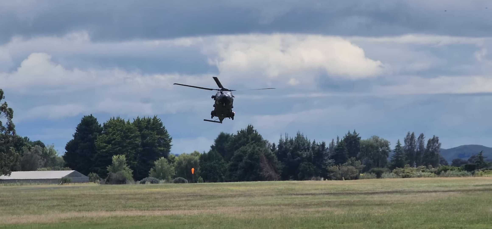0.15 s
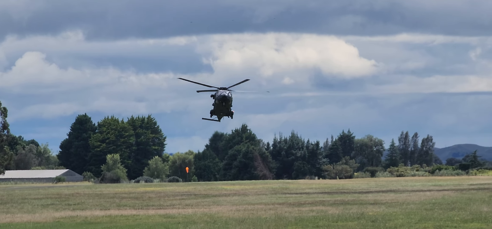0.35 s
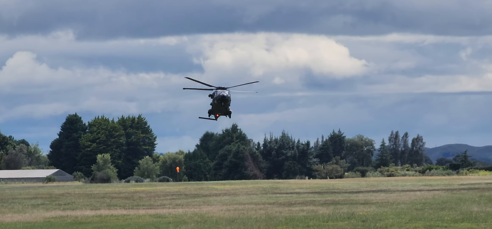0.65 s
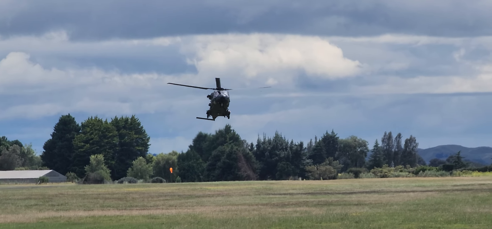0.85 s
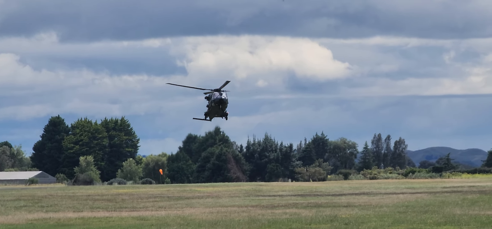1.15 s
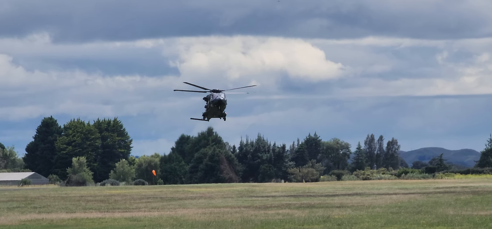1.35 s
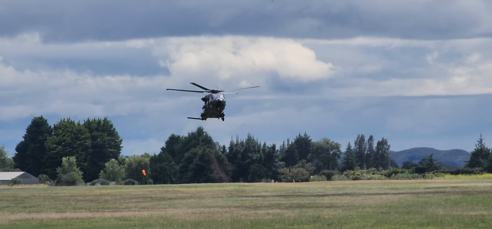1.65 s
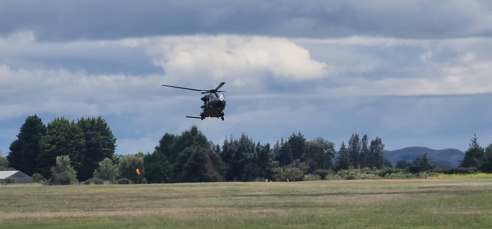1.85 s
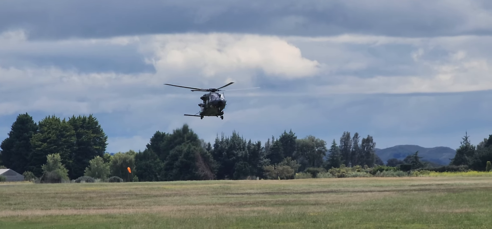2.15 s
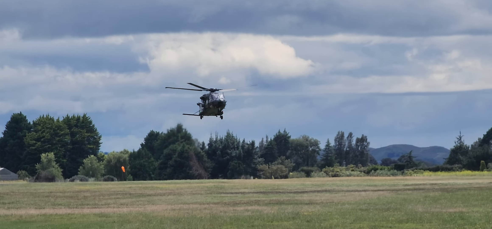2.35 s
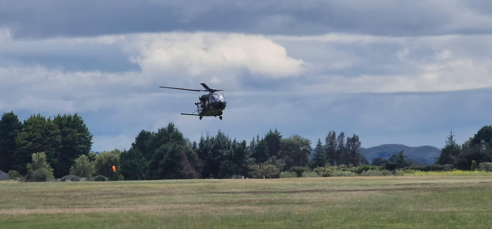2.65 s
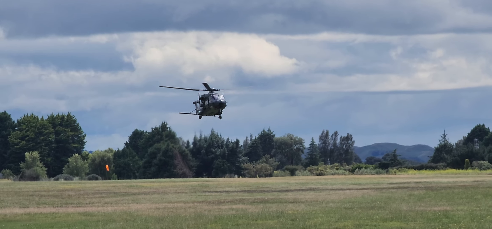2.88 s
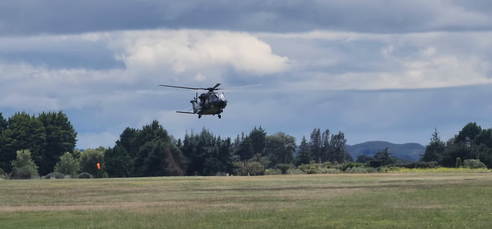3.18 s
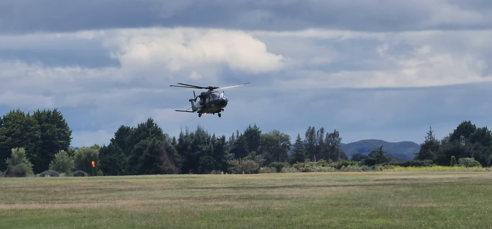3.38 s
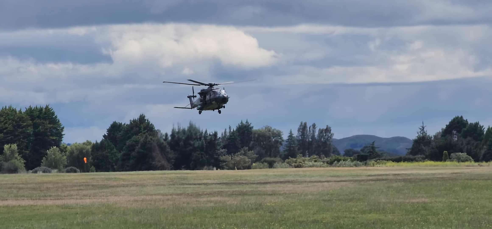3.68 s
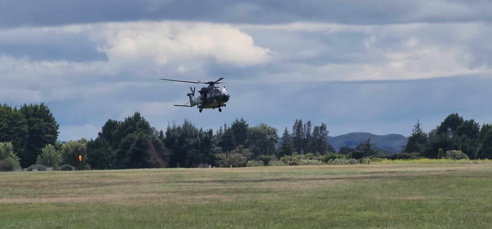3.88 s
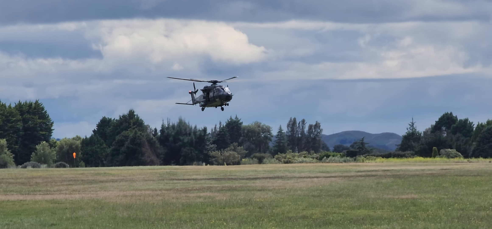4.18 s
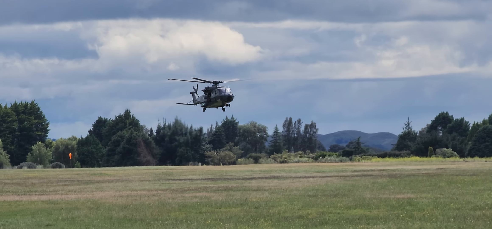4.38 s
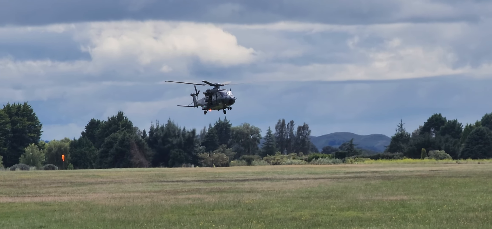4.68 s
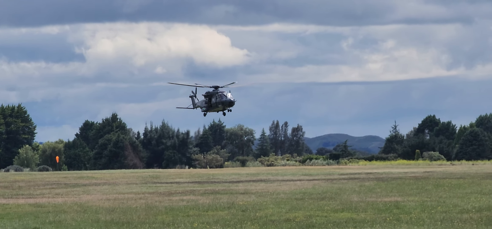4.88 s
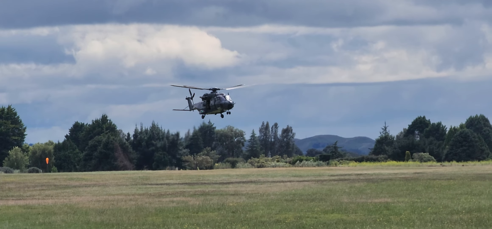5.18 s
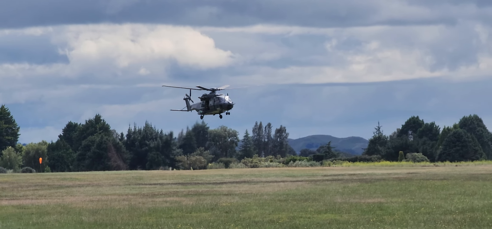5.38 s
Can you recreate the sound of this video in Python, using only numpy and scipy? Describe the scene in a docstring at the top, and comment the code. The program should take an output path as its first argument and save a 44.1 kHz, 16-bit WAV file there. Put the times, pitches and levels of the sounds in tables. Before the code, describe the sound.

A heavy helicopter hovers low over a field, its rotor slapping hard at first, then easing into a breathy chop over turbine roar.

```python
"""On a grass airfield, a helicopter flies in low and turns side-on into a hover.
Each blade pass brings a pressure thump, a slap where it cuts the wake, and a swish of tip noise.
These beats are shaped single clicks and bursts of noise; hard strikes are short rings.
Steady coloured noise makes the roar of downwash and turbines; wavering sines make a drone and a tail hum.
An insect chirps in the grass with gliding sines; a few small ticks of noise sound close by."""
import sys
import numpy as np
from scipy import signal
from scipy.fft import rfft, irfft
from scipy.io import wavfile
from scipy.ndimage import map_coordinates

SR = 44100
rng = np.random.default_rng(int(sys.argv[2]) if len(sys.argv) > 2 else 0)


def store_wav(level_fs):
    """Save 16-bit WAV to argv[1]."""
    pcm = np.round(np.clip(np.atleast_2d(level_fs), -1, 1) * 32767)
    wavfile.write(sys.argv[1], SR, pcm.T.astype(np.int16))


N = 243873
T = np.arange(N) / SR   # time of each sample, in seconds
BINS = np.maximum(np.arange(N // 2 + 1) * SR / N, 1)   # pitch of each spectrum bin, in Hz

BLADE_HZ = 17.42   # passes of a main rotor blade per second
# How far ahead of the thump each sound comes, in seconds
SLAP_AHEAD_S, CHUFF_AHEAD_S, SWISH_AHEAD_S = 0.003007, 0.0064, 0.0078

# How hard the blades are loaded: heavy in the flare, then surging as the machine settles and turns.
# Each row: time in seconds, loading in dB (only its swings around the mean are used).
BLADE_LOADING = [(0.04, -18), (0.21, -16.5), (0.27, -19), (0.33, -16.5), (0.44, -14.5), (0.7, -12.5),
                 (0.85, -13), (0.96, -18), (1.07, -21), (1.126, -14.5), (1.183, -25.5), (1.24, -17.5),
                 (1.31, -23.5), (1.47, -19), (1.7, -30.5), (1.81, -20.5), (1.99, -17.5), (2.04, -29.5),
                 (2.39, -21), (2.5, -29), (2.56, -16.5), (2.65, -26.5), (2.84, -23.5), (3.3, -33),
                 (3.47, -22.5), (3.65, -23.5), (3.82, -17.5), (3.88, -20), (3.94, -24), (4.11, -26),
                 (4.17, -30.5), (4.57, -32), (4.63, -22.5), (4.91, -28), (5.49, -29)]
# Strength of the tip noise, growing as the machine comes side-on.
# Each row: time in seconds, strength in dB (only its swings around the mean are used).
TIP_NOISE = [(0.04, -30), (0.1, -40), (0.2, -34), (0.62, -38), (1.45, -34), (2.1, -29.5), (2.27, -31),
             (2.95, -30.5), (3.2, -35.5), (3.41, -34.5), (3.65, -34.5), (3.76, -30), (4.3, -29.5),
             (4.57, -27), (4.8, -28.5), (5.2, -26.5), (5.49, -33)]


def from_db(db):
    """Turn decibels into a gain."""
    return 10 ** (np.asarray(db) / 20)


def rms_one(x):
    """Scale a sound to an rms level of 1."""
    return x / np.sqrt(np.mean(x ** 2) + 1e-20)


def in_time(rows, t=T):
    """Read each column of a curve at the times t."""
    s, *columns = np.transpose(rows)
    return [np.interp(t, s, c) for c in columns]


def following(curve, db, share):
    """A level in dB over time: its mean, plus a share of the swing of a control curve."""
    control, = in_time(curve)
    return db + share * (control - control.mean())


def coloured(x, spectrum, turn=1):
    """Filter x with a spectrum and turn its phase; the result has rms 1."""
    hz, db = np.transpose(spectrum)
    gain_db = np.interp(np.log(BINS), np.log(hz), db, left=-90, right=-90)
    return rms_one(irfft(rfft(x) * turn * from_db(gain_db), N))


def drift(rate):
    """A smooth random wander with rms 1, through `rate` random points per second."""
    knots = rng.standard_normal(int(N / SR * rate) + 4)
    coarse = T[::24]
    curve = map_coordinates(knots, [coarse * rate + 1], order=3, mode="nearest")
    return rms_one(np.interp(T, coarse, curve))


def stereo_noise(side_db):
    """White noise common to both ears, plus a part in which they differ."""
    mid, side = rng.standard_normal((2, N))
    return rms_one(mid + from_db(side_db) * side * np.array([[1], [-1]]))


def blade_times():
    """When the thump of each blade arrives, in seconds."""
    # Delay of the thump within each blade period, shifting with range and heading.
    # Each row: time in seconds, delay in seconds.
    delay = [(0, 0.041), (.6, 0.038), (2, 0.034), (2.5, 0.033), (3, 0.03), (3.4, 0.029), (3.8, .0338),
             (4.3, 0.036), (5.53, 0.034)]
    passes = np.arange(int(N / SR * BLADE_HZ)) / BLADE_HZ
    return passes + in_time(delay, passes)[0]


def beats(times, level_db, jitter_s, spread_db):
    """One impulse per blade, each a little off in moment and strength; also their rms level."""
    late, strong = rng.standard_normal((len(times), 2)).T
    at = np.clip(((times + jitter_s * late) * SR).astype(int), 0, N - 1)
    out = np.zeros(N)
    out[at] = from_db(level_db[at] + spread_db * strong)
    level = np.sqrt(np.mean(from_db(level_db[at]) ** 2))   # without the random spread
    return out, level


def bursts(train, rise_s, decay_s):
    """Each impulse opens an envelope that swells and dies away."""
    age = T[:SR // 8]
    envelope = (1 - np.exp(-(age / rise_s) ** 2)) * np.exp(-age / decay_s)
    return signal.fftconvolve(train, envelope)[:N]


def throb(times):
    """A swing between 1 at each blade pass and -1 between passes."""
    blade_count = np.interp(T, times, np.arange(len(times)))
    return np.cos(2 * np.pi * blade_count)


def multipath(x, level_db, wander_s):
    """Ground and eddies add short paths of wandering length, so the colour shifts from beat to beat."""
    out = x.copy()
    for lag_s in [.0023, .0037, .0052, .0071]:
        late = T - lag_s - wander_s * drift(2.5)
        copy = np.array([np.interp(late, T, ear) for ear in x])
        out += from_db(level_db) * drift(5) * copy
    return out / np.sqrt(1 + 4 * from_db(level_db) ** 2)   # allow for the power of the four copies


def ground_bounce(x, level_db):
    """The grass returns a copy a few milliseconds late; its comb of colour slides as the machine moves."""
    # Lag of the bounce off the ground. Each row: time in seconds, lag in seconds.
    bounce_lag = [(0, .0036), (2.1, .0039), (2.7, .0036), (3.4, .0029), (5.53, .0029)]
    lag_s, = in_time(bounce_lag)
    bounce = np.array([np.interp(T - lag_s, T, ear) for ear in x])
    return (x + from_db(level_db) * bounce) / np.hypot(1, from_db(level_db))


def echoes(x, level_db, decay_s):
    """The tree line scatters a few dull echoes, different at each ear."""
    lag_s = rng.uniform(.008, .2, (2, 30))
    taps = np.zeros((2, SR // 4))
    for ear in range(2):
        signs = rng.choice([-1, 1], lag_s.shape[1])
        taps[ear, (lag_s[ear] * SR).astype(int)] = signs * np.exp(-lag_s[ear] / decay_s)
    taps /= np.sqrt(np.sum(taps ** 2, axis=1, keepdims=True))
    dull = signal.sosfilt(signal.butter(1, 2500, fs=SR, output="sos"), x)
    return from_db(level_db) * signal.fftconvolve(dull, taps, axes=1)[:, :N]


def insect():
    """A thin chirp of arched and falling notes, made of gliding sines, repeats steadily a little to the left."""
    chirp_hz = 11.42   # chirps per second
    # The notes of one chirp. Each row: middle of the note as a share of the cycle, middle pitch in Hz,
    # glide in Hz per half length, fall to either side in Hz, half length in seconds,
    # level in dB before its wander and the balance between the ears.
    notes = [(.52, 9030, -70, 230, .010, -57), (.82, 8600, 0, 200, .007, -64),
             (.5, 7950, -230, 130, .009, -63.5), (.2, 8950, -150, 150, .006, -66),
             (.17, 9520, -100, 100, .005, -72)]
    out = np.zeros(N)
    for share, middle_hz, glide_hz, fall_hz, half_s, db in notes:
        from_middle_s = ((T * chirp_hz - share + .5) % 1 - .5) / chirp_hz
        age = np.clip(from_middle_s / half_s, -3, 3)   # in half lengths
        hz = middle_hz + glide_hz * age - fall_hz * age ** 2 + 30 * drift(200)
        tone = np.sin(2 * np.pi * np.cumsum(hz) / SR)
        out += from_db(db + 1.6 * drift(12.0)) * np.exp(-age ** 2) * tone
    return out * from_db([[4.5], [-1]])   # left, right


def ticks():
    """Dry ticks: noise in one broad band dies within about a millisecond, then leaves a very faint tail."""
    # Small ticks nearby. Each row: start in seconds, peak level in dB, lowest Hz, highest Hz,
    # decay in seconds.
    tick_rows = [(.2115, -37, 8300, 12100, .0008), (0.814, -20, 2800, 4100, .001),
                 (0.8664, -19.5, 2780, 4000, 0.0015), (.8955, -43, 8800, 12440, .0008),
                 (1.0435, -41, 8900, 12500, .0008), (1.2763, -15, 2680, 4200, 0.00072),
                 (3.3788, -16, 5870, 14700, 0.00031), (3.5975, -22, 3467, 13000, 0.0014),
                 (3.656, -30, 5000, 14000, 0.00081), (3.852, -33, 4030, 9000, .001),
                 (4.131, -33, 4000, 7450, 0.00078), (4.153, -33.5, 4050, 7500, 0.00078)]
    out = np.zeros((2, N))
    age = T[:SR // 12]
    for s, db, low_hz, high_hz, decay_s in tick_rows:
        envelope = np.exp(-age / decay_s) + 0.07 * np.exp(-age / 0.018)
        crackle = rng.standard_normal((2, len(age))) * envelope
        crackle = signal.lfilter(*signal.butter(2, [low_hz, high_hz], "band", fs=SR), crackle)
        at = int(s * SR)
        out[:, at:at + len(age)] += from_db(db) * crackle / np.abs(crackle).max()
    return out


def roar(times):
    """Downwash noise follows the loading, exhaust noise opens up side-on; all waver in the moving air."""
    # Colours of the downwash, exhaust, turbine hiss and high air. Each row: pitch in Hz, level in dB per Hz
    # (only the shape counts).
    wash_colour = [(12, -39), (28, -5.5), (55, 1.5), (88, -1), (160, -1), (205, -5), (290, -7), (450, -11),
                   (700, -25), (1200, -67)]
    engine_colour = [(250, -16), (450, 3), (740, -0.5), (900, -2), (1080, -0.5), (1240, -6), (1500, 0),
                     (1820, -6), (2100, -4), (2450, -11), (3000, -11.5), (3500, -15), (4500, -27),
                     (7000, -55)]
    hiss_colour = [(2500, 2.5), (3500, 3), (4200, 7), (4900, -1.5), (5400, 1.5), (6200, -9.5), (6900, -23),
                   (9000, -24)]
    air_colour = [(5000, -2.5), (6900, -7), (7700, -1), (8600, 3.5), (9100, -3.5), (9500, -10),
                  (10600, -17.5), (11700, -9), (14000, -12.5), (15800, -13.5)]
    # Levels of the turbine hiss and high air before wavering. Each row: time in seconds, level in dB.
    hiss_level = [(0, -49), (.22, -48), (.38, -43.5), (.44, -46.5), (.5, -43.5), (.7, -47), (1, -47.5),
                  (1.4, -50), (2.2, -48.5), (3.1, -50.5), (3.6, -49.5), (3.85, -46), (4.2, -48.5),
                  (4.6, -47), (4.9, -48.5), (5.53, -51)]
    air_level = [(0, -55), (2.8, -54.5), (3.25, -54), (4.2, -53.5), (5.53, -55)]

    wash_db = following(BLADE_LOADING, db=-25.0, share=0.2) + 2.4 * drift(14)
    wash = from_db(wash_db) * coloured(stereo_noise(side_db=-11.5), wash_colour)

    engine_db = following(TIP_NOISE, db=-33.0, share=0.32) + 0.6 * drift(12)
    engine = from_db(engine_db) * coloured(stereo_noise(side_db=-3.5), engine_colour)

    hiss_db, = in_time(hiss_level)
    hiss_db = hiss_db + 0.55 * throb(times - SWISH_AHEAD_S) + 1.44 * drift(18) + 1.6 * drift(120)
    hiss = from_db(hiss_db) * coloured(stereo_noise(side_db=1.0), hiss_colour)

    air_db, = in_time(air_level)
    air_db = air_db + 1.2 * drift(16) + 1.1 * drift(150) + .6 * throb(times)
    air = from_db(air_db) * coloured(stereo_noise(side_db=2.5), air_colour)
    air = air * from_db([[.9], [-.9]])   # a touch to the left

    return wash + multipath(engine + hiss, level_db=-5.0, wander_s=.0001) + air


def drone(times):
    """The airframe's low wavering sine, chopped by the main rotor's wake, strongest on approach and turn."""
    # Each row: time in seconds, pitch in Hz before its wander, level in dB before flutter and a small cut.
    drone_curve = [(0, 145, -26), (.18, 131.9, -20.5), (.27, 135.8, -42), (.45, 150.4, -25),
                   (.7, 149.3, -20), (1, 152.3, -32.5), (1.14, 151.7, -18.5), (1.25, 150, -48),
                   (2.3, 151.1, -48), (2.5, 151.5, -24.5), (2.85, 151, -31), (3.3, 151.1, -36),
                   (3.48, 151.2, -22), (3.84, 150.8, -24), (3.95, 150.7, -36), (4.2, 151, -32),
                   (4.4, 151, -39.5), (5.53, 154.2, -34)]
    hz, level_db = in_time(drone_curve)
    flutter_db = 2.2 * drift(26) + 1.5 * throb(times)
    phase = 2 * np.pi * np.cumsum(hz + 3 * drift(14)) / SR
    ears = np.array([phase + .3 * drift(9), phase + 0.26 * drift(10)])
    return from_db(level_db - 0.9 + flutter_db) * np.sqrt(2) * np.sin(ears)


def tail_rotor(times):
    """The fast small rotor hums on its blade rate, and throbs as each main blade's wake crosses it."""
    tail_hz = 85.63   # blade rate of the tail rotor, before its wander
    # The hum swells and fades as the tail swings.
    # Each row: time in seconds, strength in dB (only its swings around the mean are used).
    tail_swing = [(0, -15.5), (.35, -24), (.67, -15), (.75, -39), (.88, -11), (1.06, -27), (1.22, -10.5),
                  (1.35, -36.5), (1.48, -18.5), (1.75, -35), (1.83, -22.5), (2.0, -23.5), (2.24, -27.5),
                  (2.35, -19), (2.72, -37.5), (2.95, -26), (3.08, -44), (3.22, -28), (3.37, -36),
                  (3.48, -14.5), (3.65, -36.5), (3.76, -18.5), (3.97, -34), (5.53, -34.5)]
    level_db = following(tail_swing, db=-31.0, share=1.0) + 0.72 * throb(times)
    phase = 2 * np.pi * np.cumsum(tail_hz + 2.203 * drift(9)) / SR
    ears = np.array([phase + 0.31 * drift(6.9), phase + 0.21 * drift(6.9)])
    hum = np.sin(ears) + from_db(-17.0) * np.sin(2 * ears)   # with a weak octave
    return from_db(level_db + 3.1 * drift(20)) * rms_one(hum)


def rasp(times):
    """The finest eddies at the tip add a short bright edge of noise to each swish."""
    # The rasp comes and goes with the tilt of the disc.
    # Each row: time in seconds, strength in dB (only its swings around the mean are used).
    rasp_swing = [(0, -51), (.4, -52), (.6, -54.5), (1.5, -52), (1.7, -47.5), (2.0, -62), (2.15, -48),
                  (2.9, -51), (3.02, -39.5), (3.14, -38.5), (3.22, -54.5), (3.7, -49), (3.77, -44),
                  (4.1, -47.5), (4.22, -40.5), (4.5, -53), (4.57, -40), (4.85, -49), (5.03, -39),
                  (5.3, -52.5), (5.49, -61.5)]
    # Its colour. Each row: pitch in Hz, level in dB per Hz (only the shape counts).
    rasp_colour = [(2200, -15), (2850, -0.5), (3450, 6.5), (3800, -3), (4150, -3.5), (5000, -15),
                   (8000, -44)]
    rasp_db = following(rasp_swing, db=-51.5, share=0.91)
    train, level = beats(times, rasp_db, jitter_s=.0005, spread_db=2.8)
    edge = bursts(train, rise_s=0.0025, decay_s=0.0097) * stereo_noise(side_db=-4.5)
    return level * coloured(edge, rasp_colour)


def chuff(times):
    """Turbulence rolling over the blade gives each beat a rough, hollow bark of noise."""
    # Turbulence on the blades.
    # Each row: time in seconds, strength in dB (only its swings around the mean are used).
    turbulence = [(0, -44), (.55, -52.5), (.95, -36), (1.8, -33), (2.1, -30), (2.56, -29.5), (3.2, -34),
                  (3.5, -28.5), (3.9, -37.5), (4.3, -34.5), (4.6, -33.5), (5.53, -33.5)]
    # Colour of the bark. Each row: pitch in Hz, level in dB per Hz (only the shape counts).
    chuff_colour = [(250, -4), (450, -7.5), (620, 4), (740, 1), (900, -7), (1080, -0.5), (1250, -31),
                    (1600, -27), (3000, -37.5)]
    chuff_db = following(turbulence, db=-36.0, share=1.0)
    train, level = beats(times, chuff_db, jitter_s=0.0029, spread_db=2.5)
    air = bursts(train, rise_s=0.0034, decay_s=0.019) * stereo_noise(side_db=-13.0)
    return level * multipath(coloured(air, chuff_colour), level_db=-12.5, wander_s=0.00039)


def swish(times):
    """Ragged tip noise flares as each blade sweeps toward the listener; hollow pitches ring within it."""
    # Colour of the tip noise. Each row: pitch in Hz, level in dB per Hz (only the shape counts).
    swish_colour = [(800, -14), (1240, 0), (1400, 3.5), (1570, 4), (1820, 0.5), (2120, 2), (2450, -10),
                    (2900, -9), (3450, -19.5), (4150, -20), (5000, -41), (10000, -64)]
    # Hollow pitched colours ring within the swish, from a single beat to well over a second.
    # Each row: middle in seconds, half length in seconds, pitch in Hz before its wander, level in dB.
    hollow_pitches = [(2.102, 0.02, 1360, -28), (2.94, 0.25, 1490, -35.5), (3.206, 0.26, 2178, -37),
                      (3.207, 0.33, 998, -39.5), (3.797, 0.84, 770, -33.5), (4.064, 0.52, 2116, -37),
                      (4.28, 0.28, 1064, -35.5), (4.522, 0.66, 363.5, -32), (4.7, 0.61, 1450, -37)]
    pitch_wander = .02   # share of the pitch

    tips_db = following(TIP_NOISE, db=-33.5, share=0.8)
    train, level = beats(times, tips_db, jitter_s=0.00046, spread_db=0.2)
    flare = bursts(train, rise_s=0.005, decay_s=0.013)
    air = flare * from_db(2.0 * drift(450)) * stereo_noise(side_db=-6.0)
    out = level * multipath(coloured(air, swish_colour), level_db=-7.0, wander_s=0.00019)
    for s, half_s, hz, db in hollow_pitches:
        swell = np.exp(-((T - s) / half_s) ** 2)
        phase = 2 * np.pi * np.cumsum(hz * (1 + pitch_wander * drift(12))) / SR
        # Random sine and cosine strengths turn the pure pitch into a narrow band
        wavering = drift(170) * np.sin(phase) + drift(170) * np.cos(phase)
        tone = flare * swell * wavering
        out = out + from_db(db) * rms_one(tone) * np.sqrt(np.mean(swell ** 2))
    return out


def slap(times):
    """A blade cuts wake vortices: a sharp crack, a second one just after, and a short turbulent burst."""
    second_crack_s = 0.0052   # gap between the two cracks
    # How hard the blades cut their own wake.
    # Each row: time in seconds, strength in dB (only its swings around the mean are used).
    wake = [(0.04, -24.5), (0.21, -25.5), (0.45, -23.5), (0.8, -20), (1.13, -19.5), (1.3, -29), (1.7, -23),
            (2.1, -23.5), (2.5, -21.5), (2.67, -26), (3.3, -29), (3.53, -23), (4.05, -34), (4.23, -28.5),
            (4.65, -33), (4.9, -34.5), (5.1, -28), (5.49, -35.5)]
    # Colour of the cracks and burst. Each row: pitch in Hz, level in dB per Hz (only the shape counts).
    slap_colour = [(70, -14), (130, -17.5), (200, -7), (250, 3.5), (310, 5.5), (400, -8.5), (510, -1),
                   (620, -16.5), (800, -32), (1200, -50), (3000, -58)]
    wake_db = following(wake, db=-27.5, share=0.95)
    first, level = beats(times, wake_db, jitter_s=0.001, spread_db=2.5)
    second, _ = beats(times + second_crack_s, wake_db, jitter_s=0.00095, spread_db=2.0)
    cracks = coloured(first - 0.78 * second, slap_colour, turn=-1)
    envelope = bursts(first, rise_s=.0015, decay_s=.009)
    burst = coloured(envelope * stereo_noise(side_db=-7.5), slap_colour)
    return level * (from_db(-4.5) * cracks + from_db(-4.5) * burst)


def strikes():
    """A close vortex strike is a hard spike of suction with a rebound: often one dry cycle, or a short ring."""
    strike_skew = .7   # radians: 0 is a pure dip of suction, more adds a push after it
    # Hard strikes of a blade on a tip vortex; some ring at two pitches at once.
    # Each row: middle in seconds, level in dB, ring pitch in Hz, ring decay in cycles.
    strike_rows = [(0.042, -11.5, 328, 0.77), (0.041, -13.5, 1580, 1.9), (.096, -14, 243, .6),
                   (.158, -16, 300, 0.53), (.212, -13.5, 280, 0.39), (.326, -19, 400, 0.46),
                   (0.3849, -8, 368, 0.77), (.44, -6, 380, 0.75), (.4995, -11.5, 382, 1),
                   (.555, -16, 380, 0.5), (.613, -8, 378, 0.42), (.6665, -8.5, 368, 0.59),
                   (0.7285, -4, 363, 0.57), (.783, -2, 284, 1.23), (.843, -2.5, 332, 0.94),
                   (.895, -8.5, 516, 0.49), (.954, -16, 435, 0.29), (1.0115, -3, 300, 0.59),
                   (1.065, -10, 370, 0.45), (1.127, -6, 205, 0.98), (1.183, -12.5, 263, 0.79),
                   (1.244, -16, 1025, 1.7), (1.355, -9.5, 271.7, 1.16), (1.355, -17, 799, 0.31),
                   (1.582, -16.5, 557, 1.4), (1.984, -9.5, 336, 0.3), (2.041, -10, 476, 0.41),
                   (2.1, -8, 545, 3), (2.145, -11, 295, 0.41), (2.273, -19, 447, 1.5),
                   (2.386, -7, 270, 0.64), (2.449, -12, 694, 1.5), (2.499, -13, 325, 0.4),
                   (2.557, -7.5, 700, 1.44), (2.954, -13, 299, 0.9), (3.471, -16, 520, 0.34),
                   (3.533, -10.5, 248, 1.9), (3.536, -16.5, 720, 3.7), (3.646, -16, 710, 0.65),
                   (3.822, -15, 760, 1.1), (4.223, -15, 670, 1.9), (4.226, -9, 2140, 2.8),
                   (4.284, -33, 1090, 1.1), (4.34, -14, 1067, 0.5), (4.457, -19.5, 1086, 9.2),
                   (4.573, -15.5, 1670, 1.7), (4.74, -13.5, 656, 1.1), (4.802, -20.5, 635, 1.2)]
    out = np.zeros(N)
    for s, db, hz, cycles in strike_rows:
        near = np.abs(T - s) < .03
        phase = (T[near] - s) * hz   # in cycles
        envelope = np.exp((.2 - np.hypot(phase, .2)) / cycles)   # falls both ways from a rounded top
        out[near] -= from_db(db) * np.cos(2 * np.pi * phase + strike_skew) * envelope
    return out


def thump(times):
    """The loaded blade sends a deep suction between two softer pushes: the same wave shape each pass, its
    strength rising and falling with the loading."""
    thump_skew = 0.93   # radians: 0 is a pure dip of suction, more adds a push after it
    # Colour of the thump. Each row: pitch in Hz, level in dB per Hz (only the shape counts).
    thump_colour = [(18, -28), (35, -3.5), (52, 2), (70, 3), (87, 6), (105, 3.5), (125, -1), (180, -12.5),
                    (300, -16.5), (520, -25), (700, -61), (1200, -66)]
    loading_db = following(BLADE_LOADING, db=-27.5, share=1.55)
    train, level = beats(times, loading_db, jitter_s=0.00019, spread_db=0.8)
    wave = coloured(train, thump_colour, turn=-np.exp(1j * thump_skew))
    return level * wave * from_db([[-.9], [-.1]])   # left, right


def microphones(x, lag_s):
    """A close pair: the right one hears slightly later, and the width varies with pitch."""
    # How wide the pair hears each register.
    # Each row: pitch in Hz, gain in dB on the difference between the ears.
    width = [(30, 9), (80, 1.5), (130, 5.5), (195, 2), (300, -2.5), (600, -8), (760, -4.5), (900, 1),
             (1200, 0.5), (1500, 0.5), (1830, -0.5), (2100, -0.5), (2500, 0), (9000, -3)]
    hz, db = np.transpose(width)
    side_gain = from_db(np.interp(np.log(BINS), np.log(hz), db))
    mid = (x[0] + x[1]) / 2
    side = irfft(rfft((x[0] - x[1]) / 2) * side_gain, N)
    late = np.exp(-2j * np.pi * BINS * lag_s)   # a delay, as a turn of each bin
    return np.array([mid + side, irfft(rfft(mid - side) * late, N)])


def scene():
    """Both rotors, echoes of the blade beats, the steady roar and the small sounds of the field."""
    blades = blade_times()
    steady = roar(blades) + drone(blades) + tail_rotor(blades)

    tip_times = blades - SWISH_AHEAD_S
    rush = chuff(blades - CHUFF_AHEAD_S) + swish(tip_times) + rasp(tip_times)
    chop = slap(blades - SLAP_AHEAD_S) + ground_bounce(rush, level_db=-20.5)
    pressure = thump(blades)
    far = echoes(chop, level_db=-7.0, decay_s=0.054) + echoes(pressure, level_db=-12.0, decay_s=0.064)

    hits = np.array([strikes()] * 2)   # the same at both ears
    hits = hits + echoes(hits, level_db=-9.5, decay_s=.025)
    return insect() + ticks() + steady + far + chop + hits + pressure


def record(dry):
    """The microphone pair; the highest peaks are rounded and the top is cut."""
    cutoff_hz = 15700
    x = microphones(dry, lag_s=.000015)
    rounded = x / (1 + x ** 6) ** (1 / 6)
    low_pass = signal.ellip(10, .1, 80, cutoff_hz, fs=SR, output="sos")
    return signal.sosfilt(low_pass, rounded)


dry = scene()
out = record(dry)
store_wav(out)
```